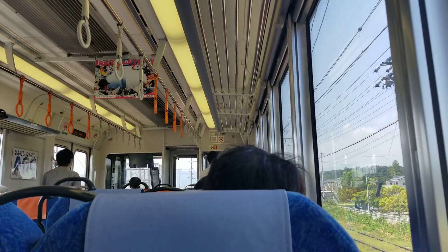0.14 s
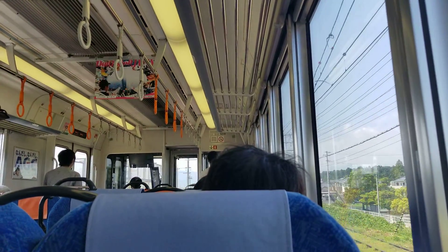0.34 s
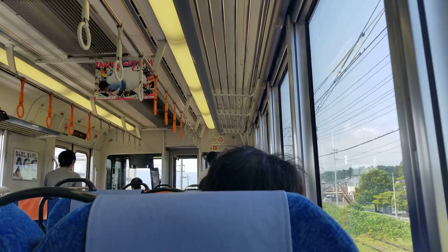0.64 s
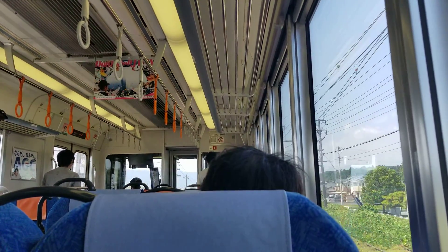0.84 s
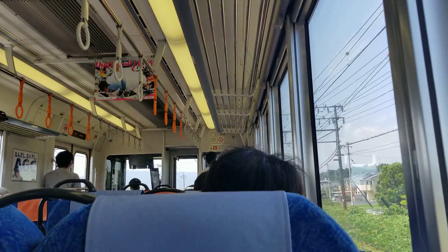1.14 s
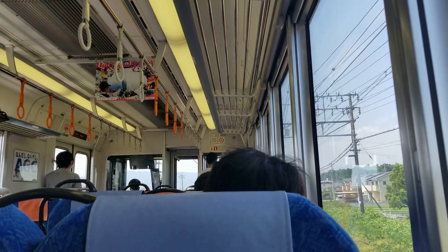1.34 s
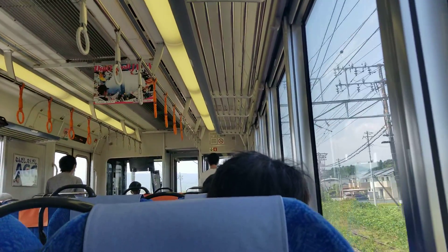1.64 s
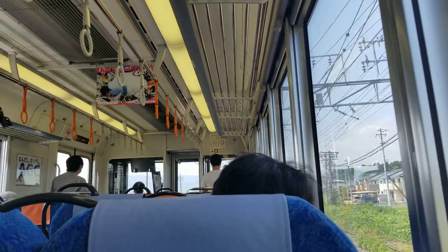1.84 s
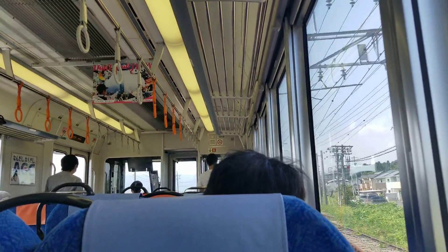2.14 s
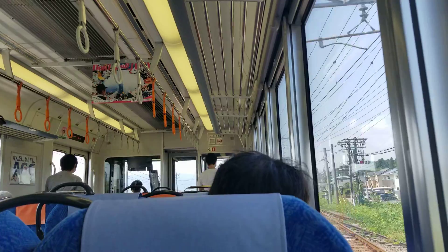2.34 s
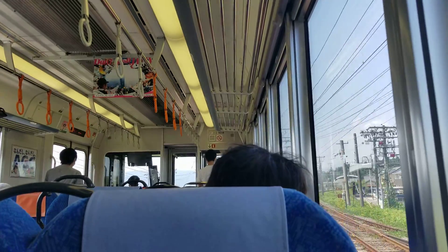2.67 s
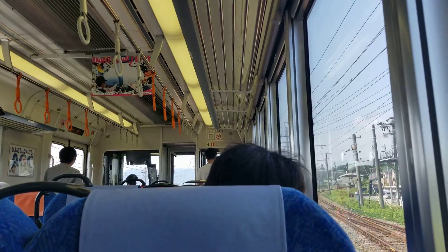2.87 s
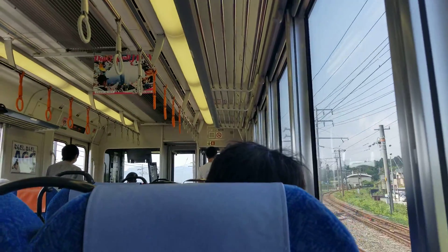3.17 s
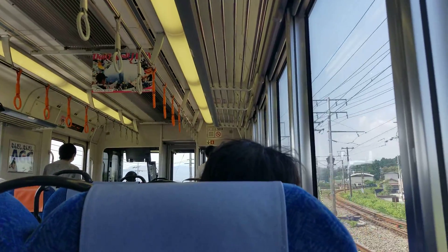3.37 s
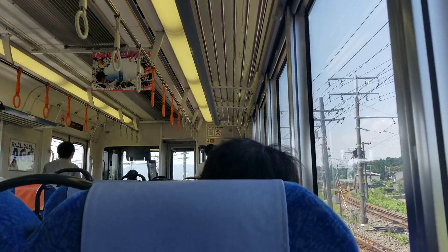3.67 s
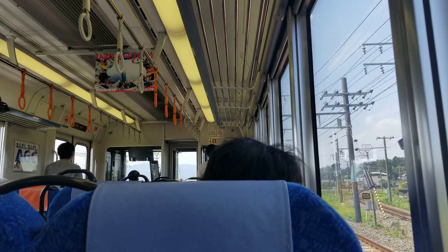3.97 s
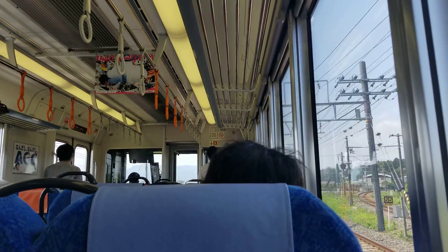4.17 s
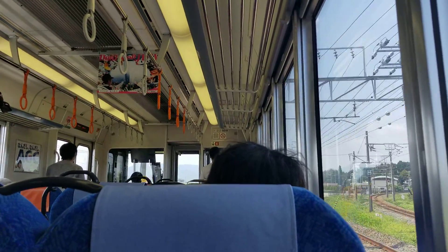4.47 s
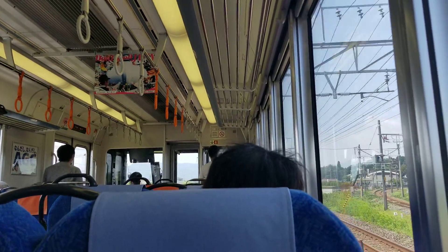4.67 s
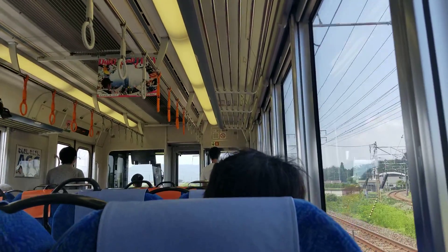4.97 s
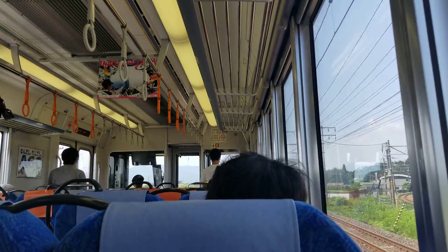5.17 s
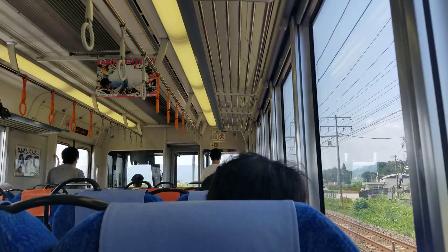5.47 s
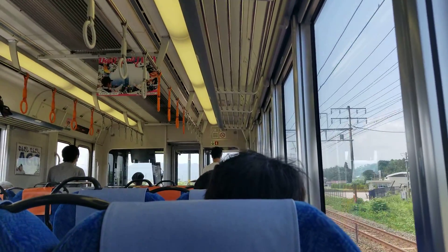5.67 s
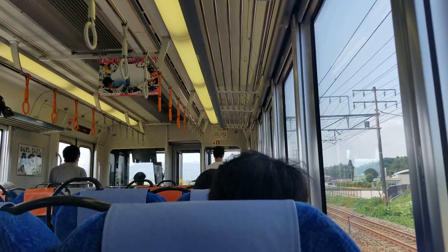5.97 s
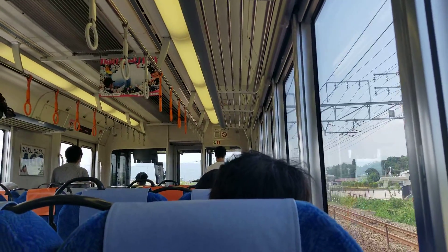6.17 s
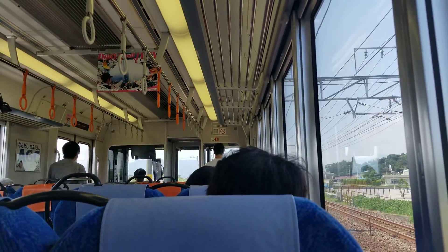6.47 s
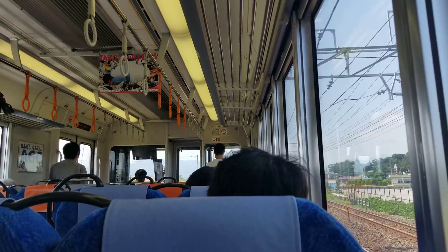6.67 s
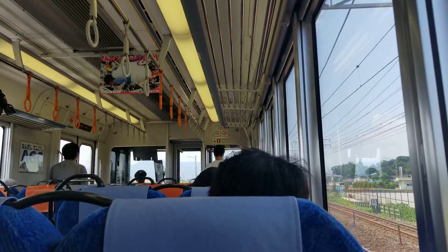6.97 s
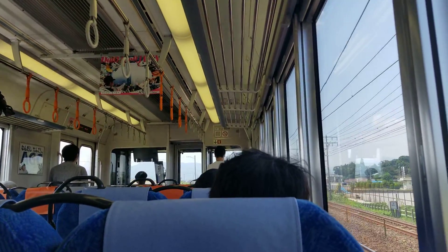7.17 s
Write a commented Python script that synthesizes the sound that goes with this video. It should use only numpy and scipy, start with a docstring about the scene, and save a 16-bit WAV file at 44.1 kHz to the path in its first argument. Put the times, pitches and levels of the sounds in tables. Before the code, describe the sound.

Inside a moving electric train car, a deep steady hum and rolling rumble, with paired wheel thuds over rail joints and loose rattles.

```python
"""A drone near 58 Hz over wheel roar, inside an electric train car running along the line.
Axles thud over rail joints, mostly in pairs; loose fittings rattle, small metal parts tinkle and scuff,
a trim panel snaps and a rubbing part squeaks. The drone, tinkles, snaps and squeaks are sums of sines;
rolling, rattles and scuffs are shaped noise; blows mix shaped noise with a pitched floor boom."""
import sys
import numpy as np
from scipy import signal
from scipy.fft import rfft, irfft, next_fast_len
from scipy.io import wavfile
from scipy.ndimage import uniform_filter1d, map_coordinates

SR = 44100
rng = np.random.default_rng(int(sys.argv[2]) if len(sys.argv) > 2 else 0)


def bounce(signal):
    """Save signal as a 16-bit WAV file at the path given by the first command-line argument."""
    frames = np.transpose(np.atleast_2d(signal))
    limited = np.clip(frames, -1, 1)
    pcm = np.round(limited * 32767).astype(np.int16)
    wavfile.write(sys.argv[1], SR, pcm)


N = 322355
T = np.arange(N) / SR

# Drone level as the train works. Each row: time in seconds, level in dB.
DRONE_S_DB = [(0, -17.5), (2.1, -18.5), (3.3, -20.5), (5.6, -22.5), (7.31, -21.5)]
DRONE_HZ, HUM_TRIM_DB = 58.0, -0.88
# A weaker hum that beats against the drone.
BEAT_HZ, BEAT_START_DB, BEAT_GROWTH_DB_PER_S = 50.2, -48, 1.84

CRUISE_DB = -21  # drone level at which the rolling noise has the levels below
RUMBLE_DB, ROAR_DB = -28, -40
ROAR_DB_PER_DRONE_DB, WORN_DB_PER_DRONE_DB = 0.35, 0.78
# The car sways and the rumble swells with it: period, first crest, swing either way.
SWAY_S, SWAY_PEAK_S, SWAY_DB = 0.948, 0.24, 1
# Hiss through the windows. Each row: time in seconds, level in dB.
HISS_S_DB = [(0, -47), (0.8, -49), (1.45, -48.5), (2.0, -50), (2.55, -51), (3.3, -50.5), (4.1, -52),
             (4.6, -51.5), (5.0, -51), (5.9, -52), (6.7, -51), (7.31, -49)]

# Two axles of a bogie crossing a rail joint. Each row: start in seconds, axle gap in seconds,
# strength in dB, second axle in dB, floor boom in dB, boom pitch in Hz, hardness in dB,
# wheel ring in dB, clank in dB; second axle, boom, ring and clank are relative to the strength.
JOINTS = [(0.267, .11, -40, -2.5, 20, 185, -3.5, -19, -15),
          (1.048, .113, -37.5, 0, 11.5, 147.8, -2, -7, -12), (1.797, 0.112, -44.5, 3, 23, 160, 2, -11, -8),
          (2.689, .101, -34, 0, 7.5, 200, 0, -14, -15), (3.458, 0.104, -39, 2.5, 10.5, 195, -2, -22, -14.5),
          (4.19, 0.076, -40.5, -0.5, 18, 127.6, 0, -1.5, -15),
          (5.31, 0.098, -35.5, 2.5, 7, 147.3, 2, 0.5, -10),
          (6.05, 0.104, -32, 2.5, 17.5, 176, 0, -11, -8.5),
          (6.786, 0.12, -36, 1.5, 15.5, 139, 2, -15, -8.5)]
# Single blows: lone jolts, and extra boom or knock under some joint axles and a rattle.
# Each row: start in seconds, strength in dB, floor boom in dB, boom pitch in Hz, hardness in dB,
# wheel ring in dB, clank in dB; boom, ring and clank are relative to the strength.
SINGLE_BLOWS = [(0.053, -38.5, 14, 200.7, 0.5, -18, -24), (0.137, -37, 21, 177.4, 1.5, -17, -18),
                (0.99, -50, 26.5, 155.6, 2, -14, -19), (1.171, -40.5, 23.5, 150, 2.5, -7, -18),
                (1.966, -39.5, 6, 165, 3, -4, -7.5), (2.086, -36, 3.5, 150, 4, -11, -6.5),
                (2.258, -37.5, 6, 153.5, 3, -4.5, -7), (3.082, -36, 17.5, 158.4, 1.5, -10, -16),
                (3.293, -47, 25.5, 170, -0.5, -19, -19), (3.411, -40.5, 0, 160, -1, -15, -20),
                (3.714, -43.5, 30, 145, 3, -19, -6.5), (4.362, -39, 8, 139, 0, -8, -11),
                (4.907, -46, 25, 125.8, 6, -13, -16), (6.205, -41, 12.5, 160, 2.5, -12, -6),
                (6.802, -50, 32.5, 139.8, 3, -15, -12)]
# Offsets from a blow's strength; a hard blow thuds and knocks less.
THUD_DB, KNOCK_DB, CLANK_DB = 5.5, -2.1, -2.3
THUD_DB_PER_HARD_DB, KNOCK_DB_PER_HARD_DB = -2, -0.51
# Underframe shake: level after the heaviest blow, growth with strength.
HEAVE_DB, HEAVE_DB_PER_STRENGTH_DB = -18.5, 3.1
# Overtones of the floor boom. Each row: multiple of its pitch (no unit), level in dB.
FLOOR_OVERTONES_DB = [(1.63, -17.5), (2.45, -23)]
# Resonances of a struck wheel. Each row: frequency in Hz, width in Hz, level in dB.
WHEEL_HZ_DB = [(695, 54, 1), (892, 110, -6.5), (1350, 100, -11), (1820, 90, -22), (2000, 90, -18.5)]
# Roar surge over rail battered around each joint.
WORN_DB, WORN_WIDTH_S = -42, 0.15

# Loose fittings. Each row: start in seconds, level in dB, brightness in dB, t60 in seconds, tick in dB.
RATTLES = [(1.537, -46, -4, 0.2, -41), (1.552, -53.5, -13, 0.07, -47), (1.566, -46, -10.5, 0.09, -46.5),
           (1.722, -45.5, -6.5, .11, -44.5), (2.126, -50.5, -3, 0.43, -38), (2.145, -55.5, -4, .4, -55),
           (2.186, -60, -8, 0.069, -49.5), (2.216, -52, -9.5, 0.5, -56), (2.225, -57.5, -5.5, 0.14, -50),
           (2.26, -44.5, -4.5, 0.27, -44), (2.28, -51.5, -4, .2, -44.5), (2.369, -60, 5, .08, -56),
           (2.392, -58, -13.5, 0.29, -38.5), (2.565, -57, 4.5, 0.41, -54), (2.843, -56, -14, 0.3, -56),
           (3.865, -54.5, 1.5, 0.11, -48), (4.777, -50, -7.5, 0.25, -56), (3.618, -55, -14.5, 0.14, -58),
           (5.125, -58.5, -13, 0.25, -68), (5.793, -58.5, -1, 0.33, -58), (6.03, -62.5, -15.5, 0.49, -62),
           (6.066, -64, -12, 0.37, -54.5), (6.42, -44.5, -4, 0.36, -48.5), (6.67, -57, -1, 0.33, -60),
           (6.94, -58, -9.5, 0.25, -60)]
# Fine shiver of the fittings: at rest, just after the loudest rattle, t60 of that stir.
SHIVER_DB, STIRRED_DB, SETTLE_T60_S = -67.5, -65, 1.7
# A trim panel snapping, dry. Each row: start in seconds, peak in dB.
SNAPS_S_DB = [(1.554, -32.5), (1.564, -29), (1.5732, -39), (1.725, -38), (2.186, -31.5), (2.3922, -35)]
# Modes of the panel. Each row: nominal frequency in Hz, level in dB, t60 in seconds.
SNAP_MODES = [(3130, -2.5, .005), (4460, 3, 0.0046), (6900, -9.5, .003), (12000, -20, .003)]
# Things shifting softly. Each row: start in seconds, level in dB, t60 in seconds,
# lower rasp relative to upper in dB, before the offsets below.
SCUFFS = [(1.753, -59, 0.26, -2), (3.005, -61.5, 1.0, -5), (3.7, -66, 0.94, -5), (5.266, -50, .29, -4),
          (5.88, -63.5, 0.67, 2), (6.0, -62, 0.99, -2.5), (6.94, -60.5, 0.3, 1), (7.13, -54.5, 0.33, 1)]
UPPER_RASP_DB, LOWER_RASP_DB = 3.0, 3.5  # offsets from a scuff's level
# Metal parts slide just before they touch and ring.
SLIDE_DB, SLIDE_LEAD_S, SLIDE_T60_S = -57.5, 0.011, 0.24
# Small metal parts. Each row: start in seconds, level in dB,
# tilt towards the high modes in dB per octave, ring time relative to the free ring (no unit).
TINKLES = [(1.639, -68, -5, 1), (4.039, -63, -8, 1), (4.901, -48, 5, 1), (5.163, -54, -6, 1.2),
           (5.741, -48, 6, .4), (5.996, -67.5, -3, .7), (6.342, -51.5, 0, 1)]
# Modes of the metal parts. Each row: frequency in Hz, level in dB, free t60 in seconds.
METAL_MODES = [(4800, -18, .3), (6470, -12.5, 0.46), (6700, -10.5, 0.36), (8500, -11, 0.16),
               (12350, -19, 0.27), (12650, -9, 0.25), (15210, -14.5, .2), (15480, 2, .27), (15540, -7, .27),
               (15630, -13, .2)]
# A rubbing part. Each row: start in seconds, length in seconds, initial pitch in Hz, level in dB,
# roughness as phase scatter in radians.
SQUEAKS = [(4.255, .07, 1870, -56, .4), (4.472, 0.032, 1865, -50.5, .3), (5.785, .06, 4800, -56, 2.6)]
SQUEAK_RISE_HZ_PER_S = 900

# Noise spectra: rumble, roar, hiss, battered rail. Each row: frequency in Hz, relative dB per Hz.
RUMBLE_HZ_DB = [(22, -19), (33, -6), (45, -8), (70, 3.5), (88, -7.5), (115, 2), (160, -1.5), (200, -6.5),
                (260, -13), (400, -31.5)]
ROAR_HZ_DB = [(150, -41), (260, -2.5), (330, -0.5), (450, -7), (720, -6), (900, -8.5), (1150, -12.5),
              (1400, -14), (1700, -24.5), (2600, -54), (5000, -56.5)]
HISS_HZ_DB = [(1000, -6.5), (1900, 1.5), (2800, -1), (3300, -6), (4300, -10), (5600, -16.5), (6800, -21),
              (8800, -43), (15000, -38)]
WORN_HZ_DB = [(130, -9), (200, 4.5), (330, -3.5), (500, -10), (800, -12.5), (1400, -29)]
# Noise spectra of blows: panel thud and knock, bogie clank, underframe heave.
# Each row: frequency in Hz, relative dB per Hz.
THUD_HZ_DB = [(120, -28.5), (210, 0), (300, 1.5), (420, -8.5), (540, -14), (800, -24), (2000, -54)]
KNOCK_HZ_DB = [(350, -16), (520, -3.5), (720, -8.5), (900, -14), (1150, -16), (2500, -28.5)]
CLANK_HZ_DB = [(500, -20), (1000, -15.5), (1400, -4), (2700, 3), (4300, -7), (5800, -19), (9000, -25.5)]
HEAVE_HZ_DB = [(70, -14), (95, -2.5), (125, -4.5), (150, -10.5)]
# Noise spectra of fittings: first contact, high and low chatter, shiver.
# Each row: frequency in Hz, relative dB per Hz.
TICK_HZ_DB = [(1500, -21), (3000, -9), (4500, 7.5), (6500, 0.5), (9000, -15), (13000, -12), (15500, -22)]
CLICK_HZ_DB = [(2500, -15), (5000, 1.5), (7200, 2), (9000, -2), (12500, 2), (15500, -2.5)]
CLACK_HZ_DB = [(500, -9), (1300, 10), (2500, 5), (4200, -0.5), (6000, -14.5), (9000, -28)]
SHIVER_HZ_DB = [(4500, -26.5), (7000, 2), (9000, -6.5), (11000, -4), (12700, -3), (14200, -4.5),
                (15600, -18)]
# Noise spectra of the scuffs' two rasps. Each row: frequency in Hz, relative dB per Hz.
SCUFF_LOW_HZ_DB = [(4000, -2), (7000, 1), (8600, -7), (10000, -18)]
SCUFF_HIGH_HZ_DB = [(7000, -20), (8800, -9.5), (10200, -5.5), (12300, -1.5), (13200, -3), (14200, -11.5),
                    (15600, -7.5)]

# Left-right likeness of the noise. Each row: frequency in Hz, correlation (no unit).
LIKENESS = [(40, 0.98), (110, 0.96), (180, 1), (350, 0.8), (700, .5), (1200, -0.043), (2500, -0.057),
            (8000, 0.011), (13000, -0.1)]
# Balance of the ears. Each row: frequency in Hz, left minus right in dB.
BALANCE_HZ_DB = [(60, -0.5), (92, -0.5), (140, -0.5), (210, -2), (330, -3), (500, 0.0), (770, 2.5),
                 (1170, -0.5), (1790, -3), (2740, -2), (4190, -2), (6410, 3), (9810, 0.5), (15000, -0.5)]
# Peaks and dips of the cabin and its panels. Each row: frequency in Hz, width in Hz, lift in dB.
CABIN_HZ_DB = [(186, 42, 0.5), (280, 21, 1), (366, 7.9, -1.5), (413, 25, 3), (533, 23, 2), (703, 24, 0),
               (958, 30, -5), (1420, 58, 1), (2010, 52, 2.5), (2220, 320, 0), (2550, 55, 3),
               (2770, 110, 3.5), (3220, 400, -1), (3730, 240, 1.6), (4500, 89, 4)]
BAND_LIMIT_HZ = 15850


def amp(db):
    """Decibels to gain."""
    return 10 ** (np.asarray(db) / 20)


def unit(x):
    """Scaled to rms 1."""
    return x / np.sqrt(np.mean(x ** 2) + 1e-20)


def along(points, hz):
    """(Hz, value) points interpolated on a log axis."""
    f, v = np.transpose(points)
    return np.interp(np.log(hz + 1), np.log(f + 1), v)


def over_time(points):
    """(s, value) points interpolated at every sample."""
    s, v = np.transpose(points)
    return np.interp(T, s, v)


def wobble(rate_hz):
    """A smooth random curve of rms 1, rate_hz knots a second."""
    knots = rng.standard_normal(4096)
    return unit(map_coordinates(knots, [T * rate_hz + 2], mode="wrap"))


def filtered(x, response):
    """x times a response of frequency."""
    m = next_fast_len(N + 8192)
    return irfft(rfft(x, m) * response(np.fft.rfftfreq(m, 1 / SR)), m)[..., :N]


def cabin_noise(spectrum):
    """Diffuse stereo noise of rms 1: alike at both ears in the bass, unrelated in the treble."""
    closed = [(spectrum[0][0] / 2, -90), *spectrum, (spectrum[-1][0] * 2, -120)]

    def response(hz):
        turn = np.arccos(np.clip(along(LIKENESS, hz), -1, 1)) / 2
        return amp(along(closed, hz)) * [np.cos(turn), np.sin(turn)]

    mid, side = filtered(rng.standard_normal((2, N)), response)
    return unit(np.array([mid + side, mid - side]))


def patchy(x, depth_db):
    """x with gains that drift by patches of time and frequency, scaled to rms 1."""
    z = signal.stft(x, nperseg=512)[2]
    field = uniform_filter1d(rng.standard_normal(z.shape[1:]), size=5, axis=0)
    field = uniform_filter1d(field, size=14, axis=1)
    return unit(signal.istft(z * amp(depth_db * unit(field)), nperseg=512)[1][:, :N])


def even(x, size):
    """Noise with its slow swells evened out over size samples, so each blow has its given strength."""
    power = uniform_filter1d(np.mean(x ** 2, axis=0), size)
    return x / np.sqrt(np.abs(power) + 1e-9)


def blows(times_s, levels_db, t60, attack, hold=0):
    """Envelope of blows that swell, hold and die away (all in seconds); their powers add."""
    power, t = np.zeros(N + SR), np.arange(SR) / SR
    fading = np.maximum(t - hold, 0)
    swell = 1 - np.exp(-t / attack)
    for s, db, life in zip(times_s, levels_db, np.broadcast_to(t60, len(times_s))):
        envelope = amp(db - 60 * fading / max(life, .005)) * swell
        power[max(round(s * SR), 0):][:SR] += envelope ** 2
    return np.sqrt(power[:N])


def drone():
    """Underfloor machinery: a clean hum, a weaker one beating with it, a wavering octave, a thin whine."""
    phase = 2 * np.pi * DRONE_HZ * T
    ear_phase = .03 * np.array([[-1], [1]])
    hum = amp(over_time(DRONE_S_DB) + HUM_TRIM_DB + 0.8 * wobble(5.5)) * np.sin(phase + ear_phase)
    beat_phase = 2 * np.pi * BEAT_HZ * T + 0.7 * wobble(2)
    beat = amp(BEAT_START_DB + BEAT_GROWTH_DB_PER_S * T) * np.sin(beat_phase)
    octave = amp(-36.5 + 3 * wobble(5)) * np.sin(2 * phase + 1.5 * wobble(5.5))
    whine_hz = 1007
    flutter = np.array([wobble(14), wobble(14)])
    whine = amp(-58.5 + 2.3 * wobble(7.8)) * np.sin(2 * np.pi * whine_hz * T + flutter)
    return np.sqrt(2) * (hum + beat + octave + whine)


def rolling():
    """Wheels on rough rail: rumble through the floor, roar through the walls, hiss through the windows."""
    effort_db = over_time(DRONE_S_DB) - CRUISE_DB
    sway = np.cos(2 * np.pi * (T - SWAY_PEAK_S) / SWAY_S)
    surface = wobble(11)
    rumble_db = RUMBLE_DB + SWAY_DB * sway + 0.16 * surface
    rumble = amp(rumble_db) * even(cabin_noise(RUMBLE_HZ_DB), size=12000)
    roar_db = ROAR_DB + ROAR_DB_PER_DRONE_DB * effort_db + 0.5 * surface
    roar = amp(roar_db) * even(patchy(cabin_noise(ROAR_HZ_DB), depth_db=1.0), size=5000)
    hiss_db = over_time(HISS_S_DB) + 0.4 * surface
    hiss = amp(hiss_db) * patchy(cabin_noise(HISS_HZ_DB), depth_db=1.0)
    return rumble + roar + hiss


def shiver():
    """Fine high fizz of the fittings, stirred up by each rattle and then settling."""
    s, db, *_ = np.transpose(RATTLES)
    stirred = blows(s, STIRRED_DB + db - db.max(), SETTLE_T60_S, attack=.03)
    fizz = unit(patchy(cabin_noise(SHIVER_HZ_DB), depth_db=2.5) * amp(1.2 * wobble(150)))
    return np.hypot(amp(SHIVER_DB), stirred) * fizz


def all_blows():
    """Two blows for each joint, then the single blows, with the columns of SINGLE_BLOWS."""
    axles = []
    for s, gap, db, second_db, *colour in JOINTS:
        axles += [(s, db, *colour), (s + gap, db + second_db, *colour)]
    return np.transpose(axles + SINGLE_BLOWS)


def floor_boom(times_s, levels_db, pitches_hz):
    """The floor rings low and briefly, at a pitch that depends on where it is shaken."""
    waver = 0.6 * wobble(55)
    boom = np.zeros(N)
    for s, db, hz in zip(times_s, levels_db, pitches_hz):
        phase = 2 * np.pi * (hz * T + rng.random()) + waver
        tone = np.sin(phase)
        for multiple, overtone_db in FLOOR_OVERTONES_DB:
            tone += amp(overtone_db) * np.sin(multiple * phase)
        boom += blows([s], [db], t60=0.19, attack=0.0036) * tone
    return np.sqrt(2) * boom


def wheel_ring():
    """Hollow, evened ringing: noise in the narrow resonances of the wheel."""
    def resonances(f):
        return sum(amp(db) / (1 + (2 * (f - hz) / width) ** 2) for hz, width, db in WHEEL_HZ_DB)

    return even(filtered(rng.standard_normal((2, N)), resonances), size=1500)


def joints_and_single_blows():
    """At each blow the floor booms and heaves, panels thud and knock, the wheel rings, the bogie clanks."""
    s, db, boom_db, boom_hz, hard_db, ring_db, clank_db = all_blows()
    boom = floor_boom(s, db + boom_db, boom_hz)
    thud_db = db + THUD_DB + THUD_DB_PER_HARD_DB * hard_db
    thud = blows(s, thud_db, t60=0.44, attack=0.003, hold=0.012)
    thud = thud * even(cabin_noise(THUD_HZ_DB), size=900)
    knock_db = db + KNOCK_DB + KNOCK_DB_PER_HARD_DB * hard_db
    knock = blows(s, knock_db, t60=0.33, attack=0.0069, hold=0.029)
    knock = knock * even(cabin_noise(KNOCK_HZ_DB), size=900)
    ring = blows(s, db + ring_db, t60=0.3, attack=0.005, hold=0.028) * wheel_ring()
    # comes round the outside and in by the windows, so it swells a little later
    clank = blows(s + 0.0032, db + clank_db + CLANK_DB, t60=0.54, attack=0.013, hold=0.029)
    clank = clank * unit(cabin_noise(CLANK_HZ_DB) * amp(1.4 * wobble(120)))
    heave_db = HEAVE_DB + HEAVE_DB_PER_STRENGTH_DB * (db - db.max())
    heave = blows(s, heave_db, t60=0.56, attack=0.01) * even(cabin_noise(HEAVE_HZ_DB), size=2500)
    return boom + heave + thud + knock + ring + clank


def worn_rail():
    """The roar swells and sinks as the bogie runs over the battered rail ends."""
    nearness = sum(np.exp(-((T - s - gap / 2) / WORN_WIDTH_S) ** 2) for s, gap, *_ in JOINTS)
    effort_db = over_time(DRONE_S_DB) - CRUISE_DB
    level = amp(WORN_DB + WORN_DB_PER_DRONE_DB * effort_db)
    return level * nearness * even(cabin_noise(WORN_HZ_DB), size=1500)


def rattles():
    """Each fitting ticks sharply, then chatters unevenly; the cabin smears it into a short tail."""
    s, db, bright_db, t60, tick_db = np.transpose(RATTLES)
    chatter = amp(2.0 * wobble(260) + 2.6 * wobble(1500))
    tick = blows(s, tick_db, t60=0.011, attack=0.00027) * even(cabin_noise(TICK_HZ_DB), size=100)
    click = blows(s, db + bright_db - .3, t60, attack=0.0019)
    click = click * even(np.sqrt(chatter) * cabin_noise(CLICK_HZ_DB), size=1200)
    clack = blows(s, db - bright_db + .5, t60, attack=0.00098)
    clack = clack * even(chatter * cabin_noise(CLACK_HZ_DB), size=700)
    return tick + click + clack


def snaps():
    """Panel modes, slightly detuned at each ear, die within milliseconds."""
    out, t = np.zeros((2, N)), np.arange(SR // 50) / SR
    for s, peak_db in SNAPS_S_DB:
        ring = 0
        for hz, db, t60 in SNAP_MODES:
            detune = np.exp(0.063 * rng.standard_normal((2, 1)))
            ring = ring + amp(db - 60 * t / t60) * np.sin(2 * np.pi * hz * t * detune)
        out[:, round(s * SR):][:, :len(t)] += amp(peak_db) * ring / np.abs(ring).max()
    return out


def scuffs():
    """Brief sliding contacts: a grainy, high rasp with a soft start."""
    slides = [(s - SLIDE_LEAD_S, SLIDE_DB, SLIDE_T60_S, 0) for s, *_ in TINKLES]
    s, db, t60, low_db = np.transpose(SCUFFS + slides)
    grain = amp(1.6 * wobble(400))
    upper = blows(s, db + UPPER_RASP_DB, t60, attack=0.022)
    upper = upper * unit(grain * cabin_noise(SCUFF_HIGH_HZ_DB))
    lower = blows(s, db + low_db + LOWER_RASP_DB, t60, attack=0.02)
    lower = lower * unit(grain * cabin_noise(SCUFF_LOW_HZ_DB))
    return upper + lower


def tinkles():
    """Small metal parts touch and ring in decaying modes; a harder touch favours the high modes."""
    out, t = np.zeros((2, N + SR)), np.arange(SR // 4) / SR
    hz, mode_db, t60 = np.transpose(METAL_MODES)[:, :, None]
    ears_modes = (2, len(hz), 1)
    for s, db, tilt_db, free in TINKLES:
        start_db = mode_db + tilt_db * np.log2(hz / hz.max()) + 2 * rng.standard_normal(ears_modes)
        strength = amp(start_db - 60 * t / (t60 * max(free, .1)))
        wander = 0.1 * np.cumsum(rng.standard_normal(strength.shape), axis=-1)
        phase = 2 * np.pi * (hz * t + rng.random(ears_modes)) + wander
        ring = np.sum(strength * np.sin(phase), axis=1)
        out[:, round(s * SR):][:, :len(t)] += amp(db) * (1 - np.exp(-t / .004)) * ring
    return out[:, :N]


def squeaks():
    """A thin unsteady tone swells, rises and stops; phase scatter spreads a rough one into noise."""
    out = np.zeros((2, N))
    waver = np.array([wobble(500), wobble(500)])
    for s, length, hz, db, rough in SQUEAKS:
        t = np.clip(T - s, 0, length)
        phase = 2 * np.pi * (hz + .5 * SQUEAK_RISE_HZ_PER_S * t) * t + rough * waver
        out += amp(db) * np.sin(np.pi * t / length) * np.sin(phase)
    return np.sqrt(2) * out


def near_walls(x, echo_db):
    """Window, roof and seat backs return weak early copies that comb the middle and the treble."""
    delays = (rng.uniform(.004, .03, (8, 2)) * SR).astype(int)
    bright = signal.sosfilt(signal.butter(1, 600, "high", fs=SR, output="sos"), x)
    copies = np.zeros((2, N))
    for ear in range(2):
        for delay in delays[:, ear]:
            copies[ear] += np.pad(bright[ear], (delay, 0))[:N]
    return (x + amp(echo_db) * copies / np.sqrt(len(delays))) / np.sqrt(1 + amp(echo_db) ** 2)


def cabin_colour(hz):
    """Panel resonances, and the near window favouring one side or the other by band."""
    db = sum(lift / (1 + (2 * (hz - centre) / width) ** 2) for centre, width, lift in CABIN_HZ_DB)
    return amp(db + np.outer([.5, -.5], along(BALANCE_HZ_DB, hz)))


def scene():
    """All sources as heard from a window seat."""
    running = rolling() + shiver() + joints_and_single_blows() + worn_rail()
    contacts = rattles() + snaps() + scuffs() + squeaks()
    echoed = near_walls(running + contacts, echo_db=-14.5)
    return filtered(drone() + echoed + tinkles(), cabin_colour)


def record(dry):
    """Nothing is kept above the band limit."""
    return filtered(dry, lambda hz: hz < BAND_LIMIT_HZ)


dry = scene()
out = record(dry)
bounce(out)
```